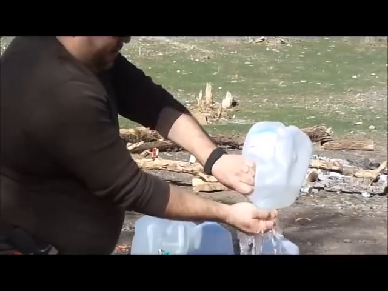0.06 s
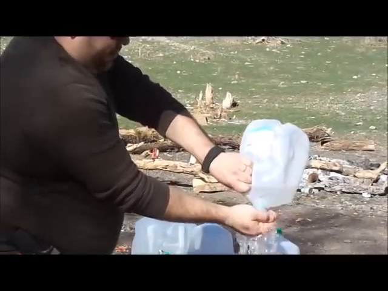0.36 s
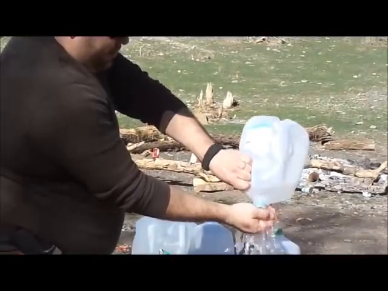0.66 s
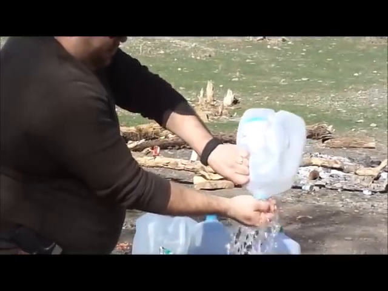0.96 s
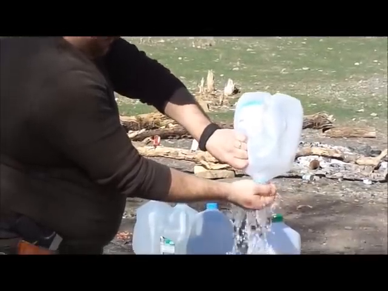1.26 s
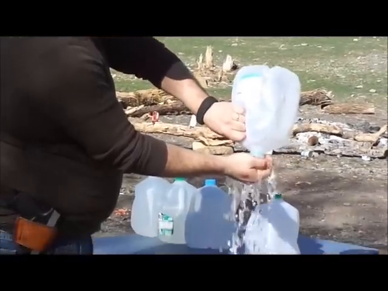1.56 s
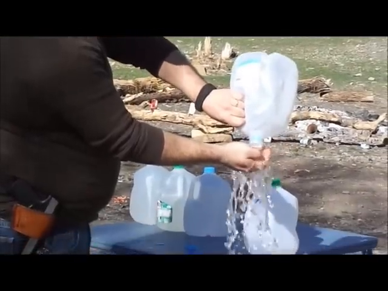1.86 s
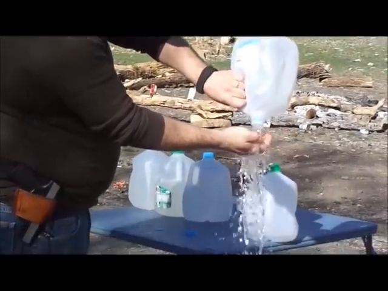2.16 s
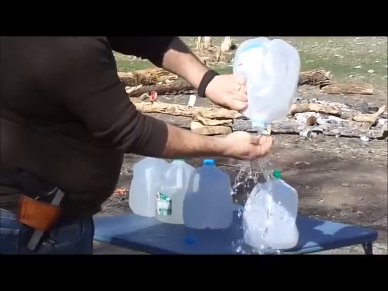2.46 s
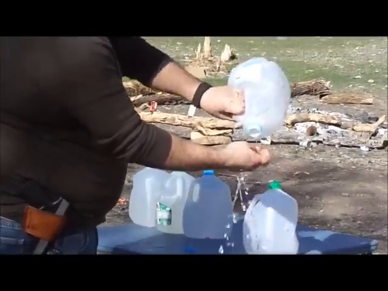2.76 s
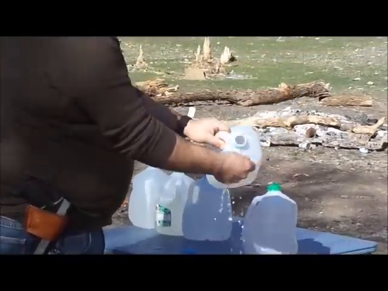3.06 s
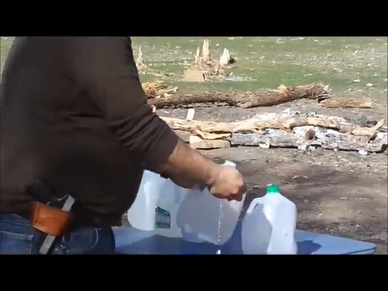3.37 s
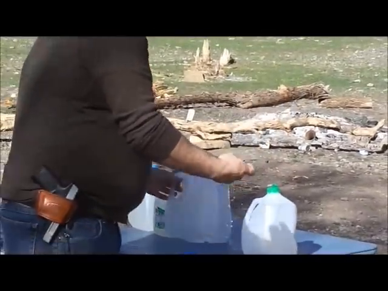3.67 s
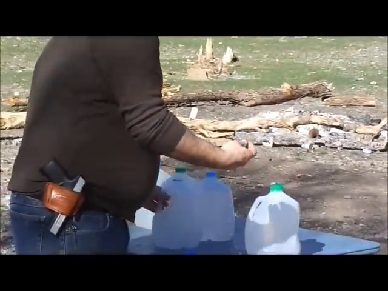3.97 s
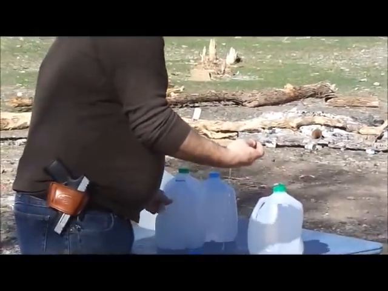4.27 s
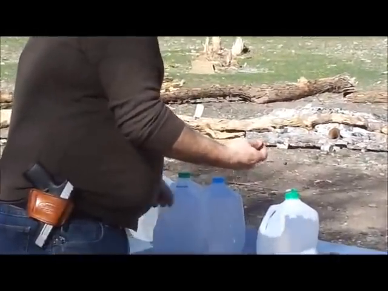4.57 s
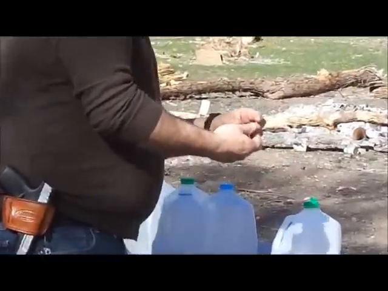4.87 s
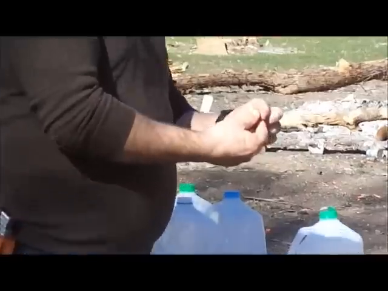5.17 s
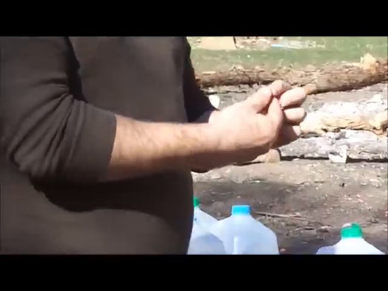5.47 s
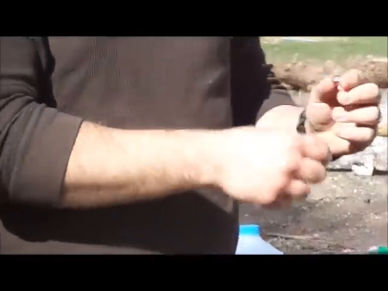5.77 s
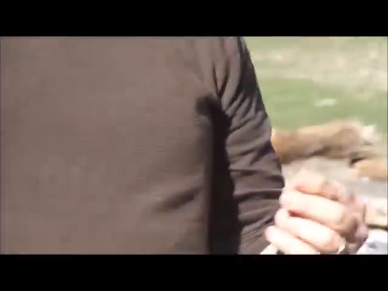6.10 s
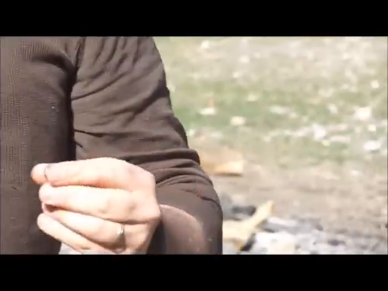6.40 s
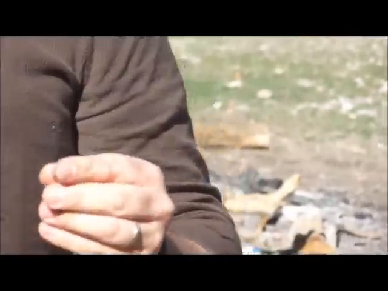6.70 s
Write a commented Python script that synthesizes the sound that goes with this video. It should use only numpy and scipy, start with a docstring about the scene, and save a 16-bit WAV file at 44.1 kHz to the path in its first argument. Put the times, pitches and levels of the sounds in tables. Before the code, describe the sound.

In a quiet outdoor spot, a stream of water splashes and patters near the microphone as a plastic jug empties with a few hollow glugs. About halfway through, it fades to a trickle and last drops, and the jug is put down with a light knock. Then a faint zoom motor whir and soft gritty footsteps follow, with a single sharp, close snap and several small dry clicks near the end.

```python
"""Emptying a jug outdoors

Water runs from an upturned plastic jug over a cupped hand and spatters on a table and the ground.
The jug gulps air, runs dry and is set down among the last drips. A camera's zoom motor whirs;
shoes scuff the dirt, with one sharp snap and a few small clicks."""
import sys
import numpy as np
from scipy import signal
from scipy.fft import rfft, irfft, next_fast_len
from scipy.io import wavfile
from scipy.ndimage import map_coordinates

SR = 44100
rng = np.random.default_rng(int(sys.argv[2]) if len(sys.argv) > 2 else 0)


def put_to_file(sound):
    """Save the sound as 16-bit audio at rate SR, in the file named by the first command-line argument."""
    columns = np.atleast_2d(sound).T  # one column per channel
    safe = np.clip(columns, -1, 1)
    whole_steps = np.round(safe * 32767)
    wavfile.write(sys.argv[1], SR, whole_steps.astype(np.int16))


N = 301657
TOP_HZ = 15180
STOP_S = 3.8  # the last trickle gives out


def amp(db):
    """Decibels to gain."""
    return 10 ** (np.asarray(db) / 20)


def unit(x):
    """Scale to rms 1."""
    return x / np.sqrt(np.mean(x ** 2) + 1e-20)


def wobble(per_s):
    """Smooth random curve through per_s knots a second."""
    knots = rng.standard_normal(int(N * per_s / SR) + 4)
    return map_coordinates(knots, [np.arange(N) * per_s / SR])


def swell(at_s, half_s):
    """Bell-shaped envelope around at_s."""
    return 1 / np.cosh(np.minimum(np.abs(np.arange(N) / SR - at_s) / half_s, 20))


def filtered(x, response):
    """Apply a frequency response, a function of f/Hz."""
    m = next_fast_len(N + SR // 2)
    return irfft(rfft(x, m) * response(np.fft.rfftfreq(m, 1 / SR)), m)[..., :N]


def coloured(x, points):
    """Minimum-phase filter through (f/Hz, level/dB) points."""
    hz, db = np.transpose(points)
    m = 2 * next_fast_len(N)
    gain = amp(np.interp(np.log(np.fft.rfftfreq(m, 1 / SR) + 1), np.log(hz), db))
    cepstrum = irfft(np.log(np.maximum(gain, 1e-6)))[:m // 2]
    cepstrum[1:] *= 2
    return irfft(rfft(x, m) * np.exp(rfft(cepstrum, m)))[:N]


def band(x, lo_hz, hi_hz):
    """Causal band-pass."""
    return signal.sosfilt(signal.butter(2, [lo_hz, hi_hz], "band", fs=SR, output="sos"), x)


def add(track, at_s, sound):
    """Mix a sound in at at_s."""
    part = track[max(round(at_s * SR), 0):][:len(sound)]
    part += sound[:len(part)]


def impacts(per_s, spread_db):
    """Random impulses of scattered size and sign."""
    size = amp(spread_db * np.clip(rng.standard_normal(N), -2, 2)) * rng.choice([-1, 1], N)
    return size * (rng.random(N) < per_s / SR)


def bursts(per_s, spread_db, decay_s):
    """Envelope of random hits, each dying away."""
    t = np.arange(SR // 20) / SR
    return unit(signal.fftconvolve(np.abs(impacts(per_s, spread_db)), np.exp(-t / decay_s))[:N])


def tick(hz, treble_db, cycles, tail_db, tail_t60_s):
    """One contact: brief ring, scattered tail and crack, with the energy of 3 ms at rms 1."""
    t = np.arange(SR // 20) / SR
    norm = lambda x: x / np.linalg.norm(x)
    ring = norm(np.sin(2 * np.pi * hz * t) * amp(-60 * t * hz / cycles) * (1 - np.exp(-t * hz)) ** 2)
    tail_decay = amp(-60 * t / tail_t60_s)
    tail = norm(band(rng.standard_normal(len(t)) * tail_decay, hz * 0.49, hz * 1.6))
    crack_decay = amp(-60 * t / 0.0022) + 0.87 * tail_decay
    crack = norm(band(rng.standard_normal(len(t)) * crack_decay, 6100, 15600))
    return norm(ring + amp(tail_db) * tail + amp(treble_db) * crack) * np.sqrt(0.003 * SR)


def outdoors():
    """Steady open air, and a dying puff of wind on the microphone."""
    # air spectrum: f/Hz, level/dB
    air_spectrum = [(20, 2.5), (60, -10), (120, -2), (280, 0), (540, 2), (1000, 1), (1550, 0.5),
                    (2400, -5.5), (4000, -7), (6700, -13), (9500, -11), (15500, -15)]
    air = amp(-56.28 + 0.24 * wobble(per_s=5)) * unit(coloured(rng.standard_normal(N), air_spectrum))
    t = np.arange(N) / SR
    wind_db = -53 - 47 * t + 2.5 * wobble(per_s=16)
    return air + amp(wind_db) * unit(band(rng.standard_normal(N), 24, 122))


def zoom():
    """Lens gears whir through the resonances of the camera body."""
    # body resonances: f/Hz, width/Hz, level/dB
    modes = [(1790, 114, 2), (2900, 300, -4), (3690, 590, -9), (5700, 720, -4), (7700, 800, -11),
             (12200, 1900, -14.5)]
    on_s, off_s, ramp_s = 4.42, 6.33, 0.1
    body = lambda f: sum((-1) ** k * amp(db) * 1j * f * width / (hz * hz - f * f + 1j * f * width)
                         for k, (hz, width, db) in enumerate(modes))
    t = np.arange(N) / SR
    running = np.clip(np.minimum(t - on_s, off_s - t) / ramp_s, 0, 1)
    return amp(-57.5) * running * unit(filtered(rng.standard_normal(N), body))


def steps():
    """Soles crunch dull dirt and drag over bright grit; a heel lands."""
    # dirt spectrum: f/Hz, level/dB
    dirt_spectrum = [(53, -89), (90, -22), (405, -4), (481, -6.5), (642, 1), (779, -9), (1120, -4),
                     (1590, -12), (2000, -10), (9000, -33), (11700, -30), (19800, -120)]
    # grit spectrum: f/Hz, level/dB
    grit_spectrum = [(530, -36), (900, -27), (2250, -10), (2820, 2), (3110, -3), (3800, -2), (5060, -12),
                     (5440, -9), (6730, -13), (12200, -14), (15500, -27)]
    # shoe scuffs: t/s, half length/s, dirt level/dB, grit level/dB
    scuffs = [(3.585, .018, -52.5, -53), (3.738, .02, -47.5, -57), (5.49, 0.059, -47.5, -51.5),
              (6.143, 0.044, -51, -52), (6.231, 0.033, -45, -67), (6.361, .0105, -51, -31.5),
              (6.434, 0.094, -57, -50), (6.729, 0.016, -46.5, -43.5), (6.826, 0.048, -47, -53.5)]
    # heel strike: t/s, level/dB, half length/s
    heel = [(6.726, -51, 0.014)]
    dirt = unit(coloured(impacts(per_s=900, spread_db=2.5), dirt_spectrum))
    slips = bursts(per_s=350, spread_db=2, decay_s=0.0015) + 0.5
    grit = unit(coloured(impacts(per_s=9000, spread_db=2) * slips, grit_spectrum))
    thud = unit(band(rng.standard_normal(N), 68, 450))
    soles = sum(swell(at_s, half_s) * (amp(dirt_db) * dirt + amp(grit_db) * grit)
                for at_s, half_s, dirt_db, grit_db in scuffs)
    return soles + sum(amp(db) * swell(at_s, half_s) * thud for at_s, db, half_s in heel)


def clicks():
    """The empty jug knocks against other jugs; later, small dry handling clicks."""
    # contacts: t/s, relative level/dB, f/Hz, relative treble/dB
    contacts = [(3.964, -36, 1750, -30), (3.968, -20.5, 1950, -31), (4.049, -32.5, 2360, -23),
                (4.166, -38.5, 4260, -30), (5.709, -30.5, 3370, -26), (6.107, -29, 3530, -26),
                (6.134, -25.5, 1210, -30), (6.465, -29.5, 4430, -2), (6.519, -26, 3630, 4),
                (6.532, -25.5, 3370, -4), (6.572, -30.5, 2480, -29), (6.753, -25, 2380, -9)]
    out = np.zeros(N)
    for at_s, db, hz, treble_db in contacts:
        add(out, at_s, amp(db - 8.5) * tick(hz, treble_db + 7, cycles=8, tail_db=-4, tail_t60_s=0.024))
    return out


def snap():
    """Something hard snaps close by and rebounds; the surroundings answer faintly."""
    # snap and two rebounds: t/s, level/dB
    hits = [(6.0597, -3), (6.0635, -6.5), (6.067, -35)]
    # ringing modes: f/Hz, level/dB, t60/s
    modes = [(1790, -7, 0.012), (2670, 0, 0.0027), (3070, -15, .010), (4420, -11.5, 0.0065),
             (6950, -23, 0.0037), (12600, -8, 0.0017)]
    out, t = np.zeros(N), np.arange(SR // 8) / SR
    ring = sum(amp(db - 60 * t / t60_s) * np.sin(2 * np.pi * hz * t) for hz, db, t60_s in modes)
    for at_s, db in hits:
        echo = band(rng.standard_normal(len(t)), 1600, 4500) * amp(-9 - 60 * t / 0.021)
        crack = rng.standard_normal(len(t)) * amp(-25 - 60 * t / 0.0073)
        add(out, at_s, amp(db) * (ring + echo + crack))
    return band(band(out, 1600, 18000), 1700, 18000)  # too small to radiate bass


def gulps():
    """Air bursts up the neck and water flops back; as the jug runs dry one big bubble rings."""
    # air bursts: t/s, relative level/dB, f/Hz, relative thump/dB, relative flop/dB
    air_bursts = [(1.71, -28, 750, -9, -5.5), (2.049, -30.5, 1120, -5, -12), (2.71, -28.5, 647, -20, 4),
                  (2.754, -27, 623, -7, -10), (2.778, -28, 590, -13, 4), (3.049, -34.5, 345, -9.5, -8),
                  (3.26, -38.5, 335, -10.5, -4)]
    # hollow jug response: f/Hz, level/dB
    cavity = [(25, -44), (50, -5), (87, -0.5), (140, -9.5), (210, -3), (290, -13), (640, -16.5),
              (1200, -10.5), (2400, -33), (4000, -75)]
    # bubble as the neck clears: t/s, level/dB, f/Hz, t60/s
    last_bubble = [(2.790, -28, 402, 0.14)]
    flop_delay_s = 0.0165
    thuds, out, t = np.zeros(N), np.zeros(N), np.arange(SR // 4) / SR
    for start_s, gulp_db, hz, thump_db, flop_db in air_bursts:
        for at_s, db in [(start_s, gulp_db), (start_s + flop_delay_s, gulp_db + flop_db)]:
            thud = rng.standard_normal(len(t)) * amp(-60 * t / 0.073)
            add(thuds, at_s, amp(db + thump_db - 1.5) * thud)
            add(out, at_s, amp(db - 6.5) * tick(hz, treble_db=-29, cycles=8, tail_db=2, tail_t60_s=0.045))
    hollow = unit(coloured(thuds, cavity)) * np.std(thuds)
    for at_s, db, hz, t60_s in last_bubble:
        envelope = amp(db - 60 * t / t60_s) * (1 - np.exp(-t / 0.007))
        add(out, at_s, envelope * np.sin(2 * np.pi * hz * t))
    return out + hollow


def plinks():
    """Drops trap bubbles that ring briefly."""
    # bubbles: t/s, level/dB, f/Hz
    bubbles = [(1.961, -27.5, 2790), (2.021, -28.5, 2800), (2.06, -27.5, 4360)]
    t60_s = 0.044
    out, t = np.zeros(N), np.arange(SR // 10) / SR
    for at_s, db, hz in bubbles:
        envelope = amp(db - 60 * t / t60_s) * (1 - np.exp(-t * hz / 2))
        add(out, at_s, envelope * np.sin(2 * np.pi * hz * t))
    return out


def flow_db():
    """Stream level re full flow: hits harder as the jug lifts, holds, drains, stops."""
    lift_s, drain_s = 0.99, 2.62
    t = np.arange(N) / SR
    lift_db = -1.5 * np.maximum(1 - t / lift_s, 0)
    return lift_db - 20.5 * np.maximum(t - drain_s, 0) - 20 * np.maximum(t - STOP_S, 0)


def stray_drops():
    """Rows for slaps(): lesser drops at uneven intervals, softer and crisper as the stream thins."""
    count, per_s = 120, 17
    jitter, size, pitch, treble = np.clip(rng.standard_normal((count, 4)), -2, 2).T
    at_s = (np.arange(count) + jitter / 2 + 1) / per_s
    stream_db = np.interp(at_s, np.arange(N) / SR, flow_db())
    db = -25 + 0.5 * stream_db + 2 * size
    hz = 3230 * np.exp(0.22 * pitch)
    treble_db = -10.5 - 0.17 * stream_db + 5 * treble
    return list(np.transpose([at_s, db, hz, treble_db])[at_s < STOP_S + 0.1])


def slaps():
    """Fat drops hit the table and the plastic jugs."""
    # fattest drops: t/s, relative level/dB, f/Hz, relative treble/dB
    fat_drops = [(0.0927, -20, 2170, -1.5), (.4617, -20, 3400, -14), (.606, -19, 2700, -26.5),
                 (0.8737, -21, 2400, -14), (1.031, -18.5, 2660, -10), (1.1135, -20.5, 2630, -25),
                 (1.1552, -15.5, 1900, -23), (1.1987, -19, 3100, -5), (1.4263, -18.5, 1890, -5),
                 (1.487, -21, 1880, -19), (1.5351, -18, 3200, -23), (1.5831, -12, 3790, -36),
                 (1.785, -20.5, 2660, -30), (1.8513, -18, 2300, -30), (1.9088, -22.5, 1250, -19),
                 (2.127, -17.5, 2900, -34), (2.1713, -14, 3330, -34), (2.192, -17.5, 2910, -22),
                 (2.2668, -18, 2790, -30), (2.335, -19, 4100, -9), (2.4755, -20, 3200, -14),
                 (2.8964, -20, 3360, -20), (2.9012, -15.5, 3930, -32), (2.928, -21, 3430, -28),
                 (2.9352, -17, 3900, -5), (3.08, -20, 3400, 6.5), (3.097, -24, 3760, -3),
                 (3.1612, -22.5, 4290, 2), (3.18, -21.5, 1700, -22), (3.2321, -20, 4480, 14),
                 (3.2552, -27, 4700, -16), (3.586, -27.5, 4000, -10), (3.6428, -29, 3470, -10),
                 (3.7207, -28.5, 1770, -7)]
    out = np.zeros(N)
    for at_s, db, hz, treble_db in fat_drops + stray_drops():
        add(out, at_s, amp(db - 11) * tick(hz, treble_db + 5, cycles=9, tail_db=-3, tail_t60_s=0.022))
    return out


def patter(per_s, centre_hz, log_spread, cycles, spread_db):
    """A rain of drops, each a damped ring rising slightly in pitch."""
    t = np.arange(SR // 40) / SR
    count = int(per_s * N / SR)
    when, pitch, size = rng.standard_normal((4000, 3))[:count].T
    start = (when * N).astype(int) % N
    hz = np.minimum(centre_hz * np.exp(log_spread * np.clip(pitch, -2, 2)), TOP_HZ)[:, None]
    gain = amp(spread_db * np.clip(size, -2, 2))[:, None]
    age = np.minimum(t * hz / cycles, 2)  # in units of t60
    envelope = amp(-60 * age) * (1 - np.exp(-t * hz / 2))
    rings = gain * envelope * np.sin(2 * np.pi * hz * t * (1 + 0.04 * age))
    samples = start[:, None] + np.arange(len(t))
    return unit(np.bincount(samples.ravel(), rings.ravel(), N)[:N])


def pour():
    """The stream breaks into blobs that burst into droplets; bigger drops ring, some trap bubbles."""
    # splash spectrum: f/Hz, level/dB
    splash_spectrum = [(82, -41), (140, -21.5), (203, -16.5), (519, -13), (631, -10.5), (1580, -8),
                       (1890, 0), (2210, -13), (2390, 0), (2790, -3), (4290, 0), (5640, -6), (8680, -11),
                       (11600, -8), (15000, -14)]
    stream_db = flow_db()
    level_db = stream_db + 0.9 * wobble(per_s=13)  # wanders on and off the table
    # a thinner stream: fewer blobs, a larger share of spray
    blob_share = np.clip(amp(0.45 * stream_db), 0.25, 1)
    spray_db = level_db - 0.25 * np.maximum(stream_db, -14)
    blobs = bursts(per_s=220 * blob_share, spread_db=3, decay_s=0.0018)

    def splash(flutter):
        droplets = unit(impacts(per_s=12000, spread_db=3))
        return coloured(droplets * (blobs + flutter + 0.7), splash_spectrum)

    highpass = lambda hz: 1 / (1 + (5200 / (hz + 1)) ** 8)
    coarse = splash(0.9 * bursts(per_s=110, spread_db=2.5, decay_s=0.005))
    body = unit(filtered(coarse, lambda hz: 1 - highpass(hz)))
    fine = splash(2.5 * bursts(per_s=800, spread_db=0.5, decay_s=0.0025))
    spray = unit(filtered(fine, highpass))
    drops = patter(per_s=420, centre_hz=3050, log_spread=0.23, cycles=12, spread_db=6)
    bubbles = patter(per_s=80, centre_hz=3300, log_spread=0.18, cycles=55, spread_db=4.5)
    plips = patter(per_s=77, centre_hz=1275, log_spread=0.435, cycles=23, spread_db=5.5)
    mist = patter(per_s=360, centre_hz=11250, log_spread=0.11, cycles=11, spread_db=6.5)
    spatter = body + amp(-1.5) * drops + amp(-8.5) * bubbles + amp(-19) * plips
    return amp(level_db - 43.5) * spatter + amp(spray_db - 43.84) * (spray + amp(-5.5) * mist)


def scene():
    """All sources reach both channels alike."""
    water = band(pour() + slaps() + plinks(), 150, 20000)  # small drops radiate no bass
    mono = water + gulps() + clicks() + snap() + steps() + zoom() + outdoors()
    return np.array([mono, mono])


def record(dry):
    """The camera's band limit: a steep low-pass."""
    return filtered(dry, lambda hz: 1 / (1 + (hz / TOP_HZ) ** 260))


dry = scene()
out = record(dry)
put_to_file(out)
```